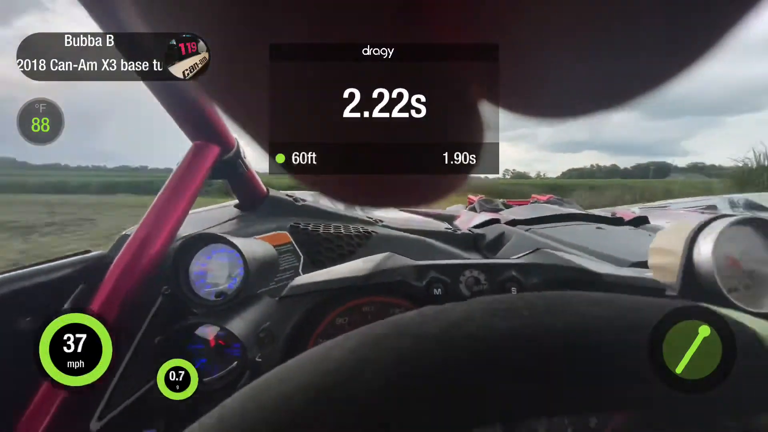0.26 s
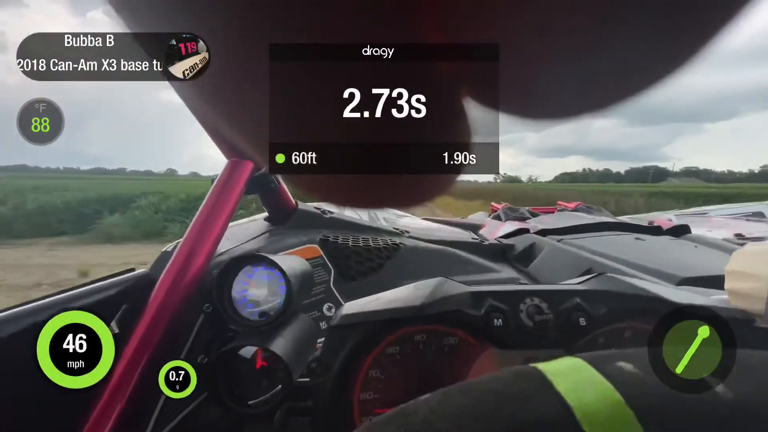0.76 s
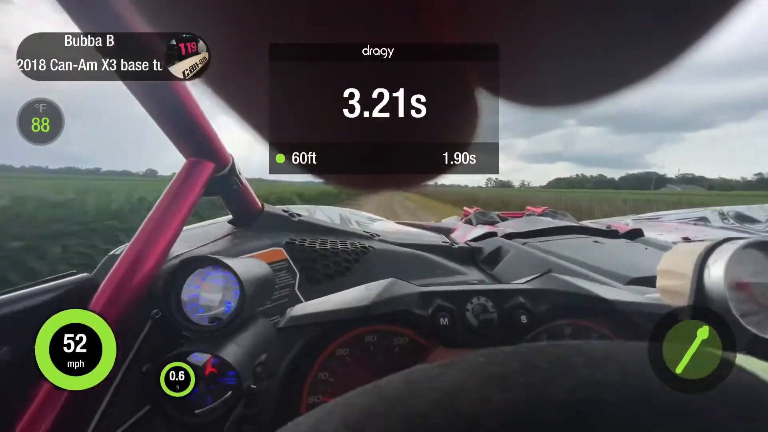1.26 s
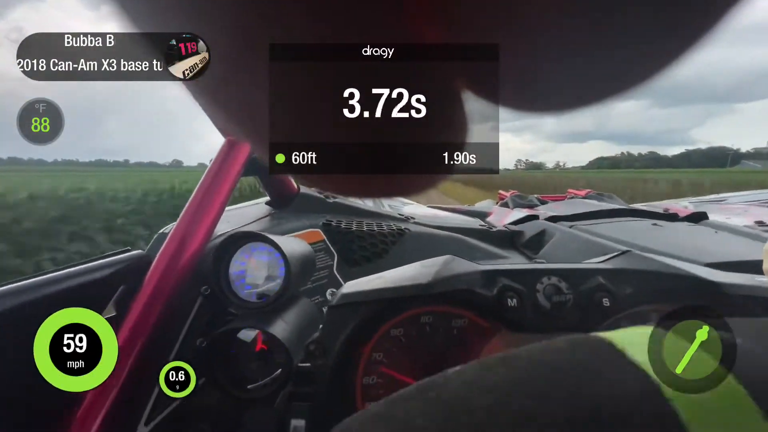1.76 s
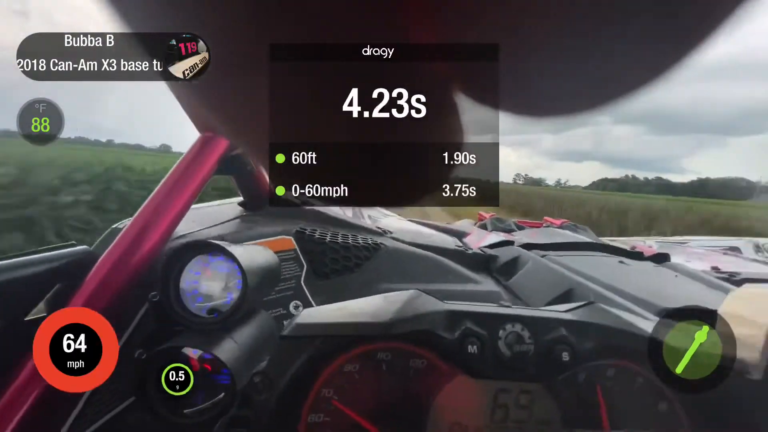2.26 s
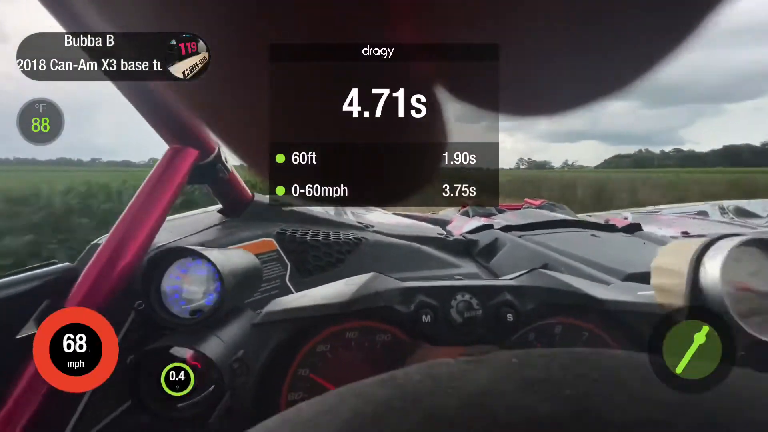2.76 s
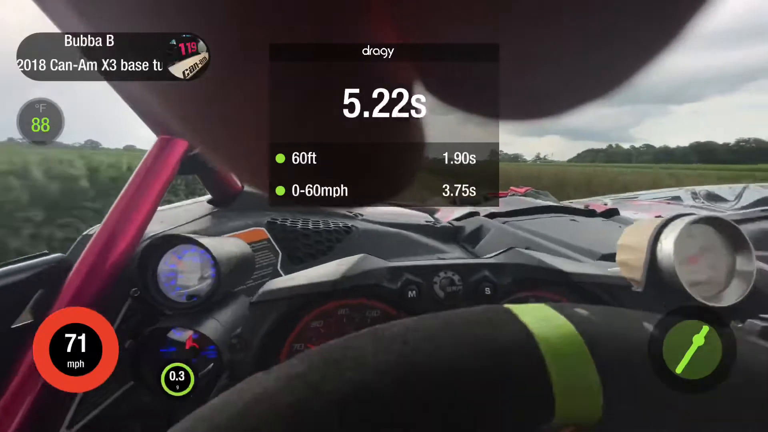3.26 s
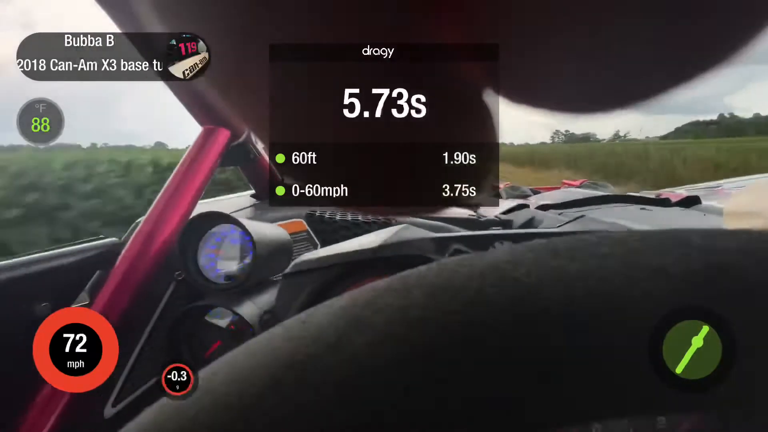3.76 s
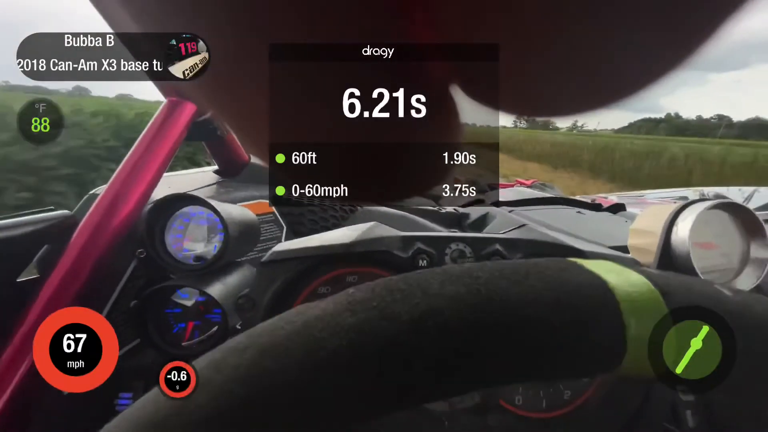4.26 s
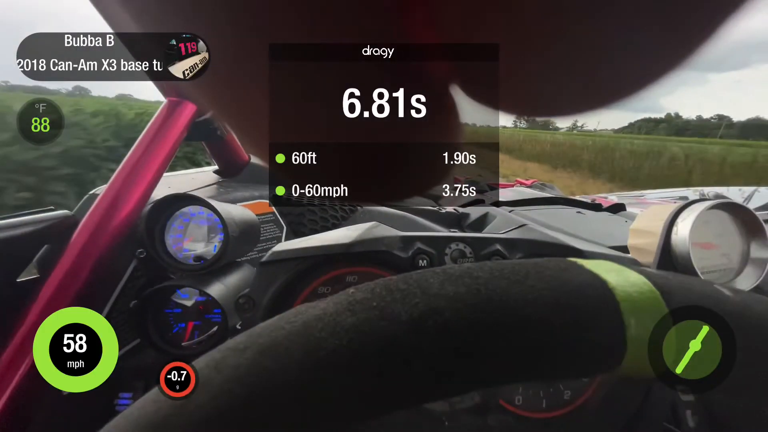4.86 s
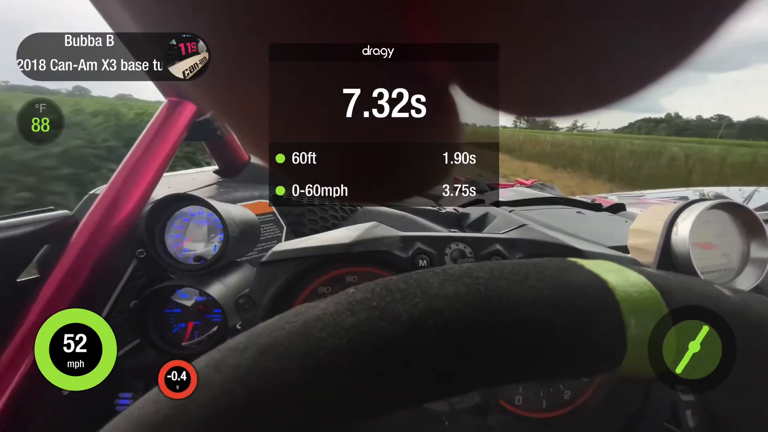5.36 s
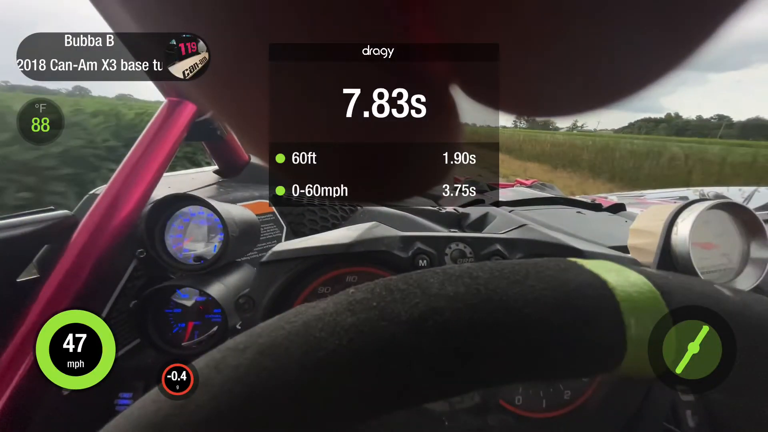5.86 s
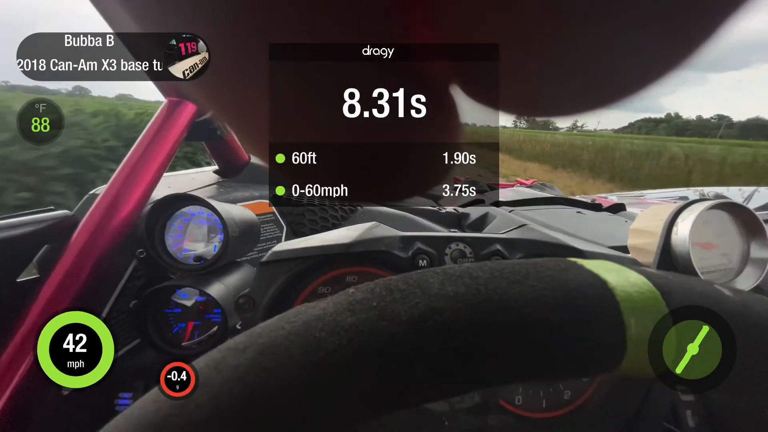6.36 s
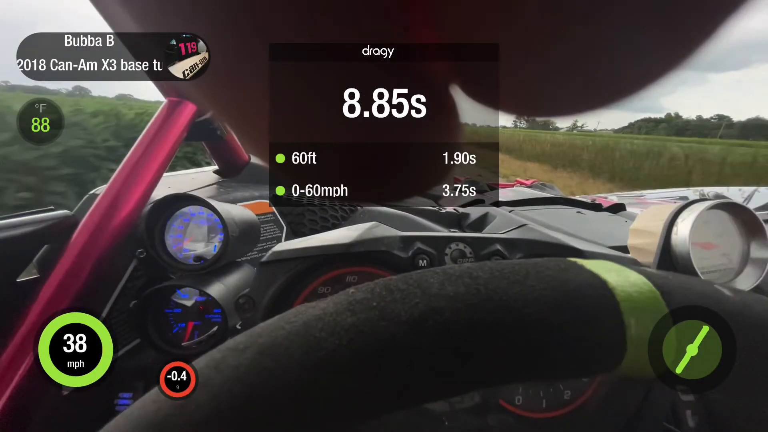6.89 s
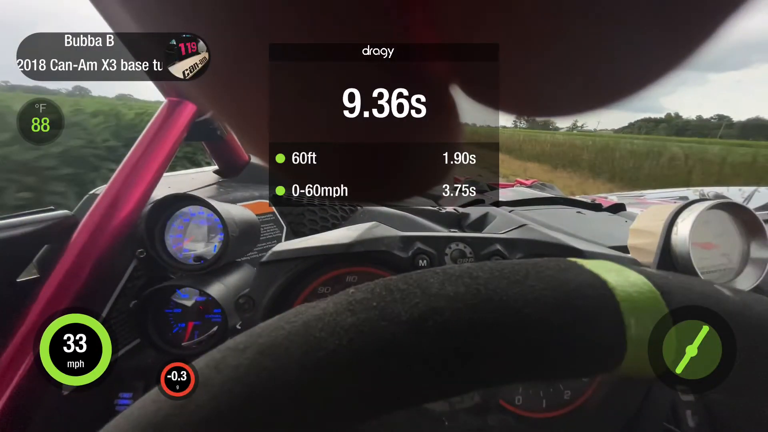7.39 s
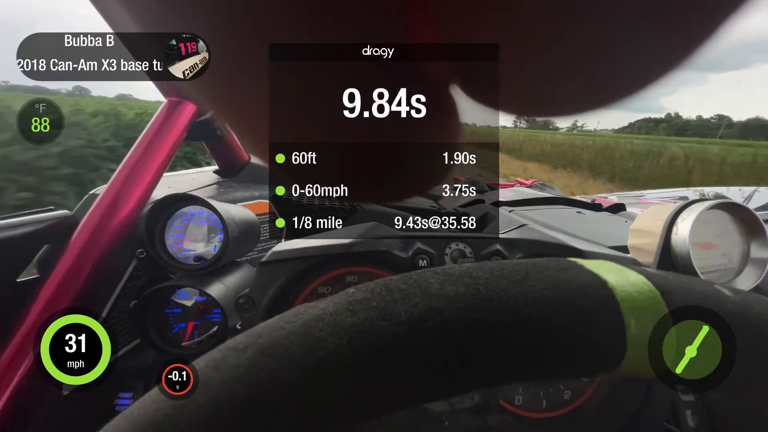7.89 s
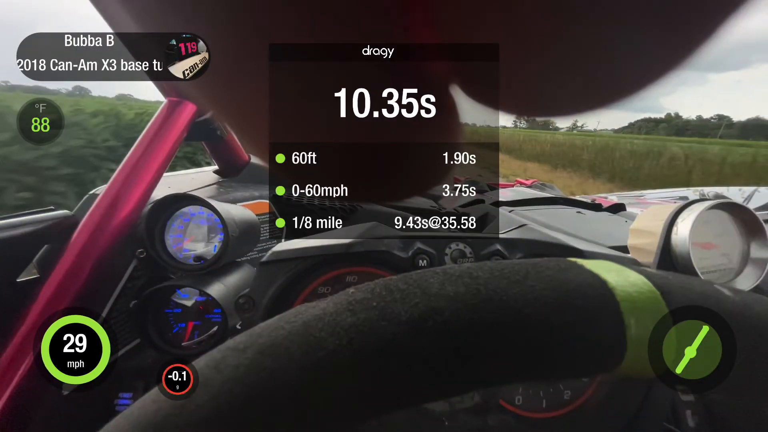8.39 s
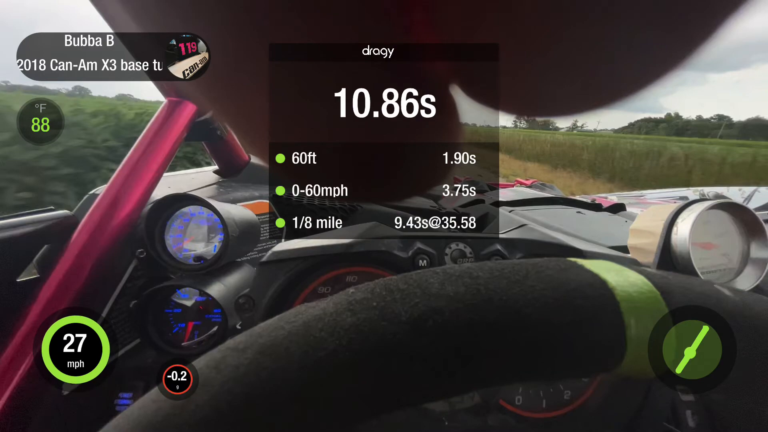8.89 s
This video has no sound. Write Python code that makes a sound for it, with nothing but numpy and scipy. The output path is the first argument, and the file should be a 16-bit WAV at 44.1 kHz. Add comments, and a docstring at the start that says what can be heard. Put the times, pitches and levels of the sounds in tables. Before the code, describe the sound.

Full-throttle turbo buggy engine and wind thumping the microphone, a brief silence, then lower, sputtering revs that slowly climb.

```python
"""In the open cab of a three-cylinder turbo buggy. At full throttle the firings blur into an exhaust
note over pulsing intake hiss, while head wind thumps, flutters and slaps ever harder on the microphone.
The sound cuts out. Then the engine revs at a standstill against a launch limiter that drops single
firings: exhaust pulses ring the pipe, knock and valve gear rattle the casing, and as the revs creep up,
whines, a panel squeal and the turbo whistle rise over fan noise and body rumble."""
import sys
import numpy as np
from scipy.fft import rfft, irfft, next_fast_len
from scipy.io import wavfile
from scipy.ndimage import map_coordinates

SR = 44100
rng = np.random.default_rng(int(sys.argv[2]) if len(sys.argv) > 2 else 0)


def transcribe(u):
    """Save the signal u as a 16-bit wav file named by the first command-line argument.

    u: samples, shape (n,) or (channels, n), limited to [-1, 1]; the rate is SR.
    q: integer samples, one column per channel.
    """
    v = np.clip(np.atleast_2d(u).T, -1, 1)
    q = np.round(v * 32767).astype(np.int16)
    wavfile.write(sys.argv[1], SR, q)


N = 402633
TIME = np.arange(N) / SR
CUT_S, STANDSTILL_S = 3.8615, 4.0945


def full_throttle():
    """The engine under load: exhaust note and intake hiss share one firing rhythm."""
    # t/s, firing rate/Hz, exhaust level/dB
    throttle = [(0, 213.9, -11), (.2, 215.3, -11.5), (.6, 217.9, -11.5), (1.15, 216.7, -14),
                (1.5, 221.9, -17), (1.92, 221.7, -15.5), (2.02, 218.4, -32.5), (2.12, 209, -20.5),
                (2.3, 218, -15.5), (2.55, 221.7, -21), (2.85, 225.3, -19), (3.2, 228.6, -19),
                (3.3, 227, -25.5), (3.5, 220, -29.5), (3.87, 203, -46.5)]
    firing_hz, note_db = curves(throttle)
    phase = firing_phase(firing_hz, waver_hz=.7)
    return amp(note_db) * exhaust_note(phase, firing_hz) + intake_hiss(phase)


def standstill():
    """The engine on the launch limiter, with its fan and the shaking body."""
    # t/s, firing rate/Hz, exhaust level/dB, clatter level/dB
    revs = [(4.095, 85, -32, -51.5), (4.18, 86.7, -24, -45), (4.45, 88.3, -21, -39.5),
            (4.7, 88.7, -20, -40), (4.9, 89.75, -20.5, -36.5), (5.25, 89.7, -20, -43),
            (5.55, 88.9, -19, -46.5), (5.8, 87.2, -19.5, -45), (6, 85.4, -18, -40.5),
            (6.2, 86.3, -17.5, -38), (6.64, 85.9, -17.5, -36), (7, 86.64, -16.5, -35.5),
            (7.42, 89.36, -14.5, -36), (7.75, 90.55, -14.5, -31), (8.09, 92, -14, -29.5),
            (8.35, 95.05, -13, -31), (8.65, 97.85, -14, -38), (8.9, 100.4, -13.5, -36),
            (9.13, 101.5, -13.5, -35.5)]
    firing_hz, exhaust_db, clatter_db = curves(revs)
    phase = firing_phase(firing_hz, waver_hz=.45)
    gaps_db = limiter_gaps()
    engine = exhaust_pulses(phase, exhaust_db - gaps_db) + amp(clatter_db) * clatter(phase, gaps_db)
    return engine + whines(phase) + panel_squeal() + turbo_whistle() + fan(exhaust_db) + body_rumble()


def exhaust_note(phase, firing_hz):
    """Fast firings fuse into a note; a cab resonance lifts the overtone passing through it."""
    # multiple of the firing rate, relative level/dB; thirds come from unlike cylinders
    orders = [(1, 0), (2, -11), (8 / 3, -17), (3, -14), (4, -15), (13 / 3, -19), (5, -14), (6, -21),
              (7, -18), (8, -24), (9, -19), (10, -25), (11, -26), (13, -25), (14, -27)]
    # cab resonance: f/Hz, width/Hz, lift/dB
    boom_hz, width_hz, boom_db = (900, 24, 11)
    note, overtone_db = np.zeros(N), -3.5
    for k, db in orders:
        lift_db = (k > 1) * overtone_db + boom_db * np.exp(-((k * firing_hz - boom_hz) / width_hz) ** 2)
        note += amp(db + lift_db + .49 * wobble(30)) * np.sin(k * phase + rng.uniform(0, 2 * np.pi))
    return np.sqrt(2) * note


def exhaust_pulses(phase, level_db):
    """One pulse a firing through pipe and muffler; the three cylinders differ a little."""
    # pipe response: f/Hz, gain/dB
    pipe = [(40, -41), (90, -1.5), (172, -1), (200, 4), (260, 3.5), (300, -6), (345, -10), (385, 0),
            (430, -14), (450, -14.5), (500, -13.5), (560, -29), (610, -22), (700, -22), (1100, -14.5),
            (3000, -37.5)]
    # muffler resonance, applied twice: f/Hz, width/Hz, gain/dB
    chamber = [(279, 414, 0)]
    k = np.arange(100)
    partials = np.where(k % 3, amp(-30) * np.exp(1j * k * k), 1) * (k > 0)
    pulses = -per_cycle(phase, partials) * amp(.7 * wobble(30))
    piped = filtered(pulses, causal(pipe))
    muffler = lambda hz: np.abs(modes(chamber)(hz)) ** 2
    return filtered(piped * amp(level_db), muffler) / np.std(filtered(piped, muffler))


def limiter_gaps():
    """Depth in dB of the holes that dropped firings leave."""
    # t/s, depth/dB
    misfires = [(4.114, 24), (4.155, 19), (4.228, 16), (4.324, 13), (4.398, 18), (4.463, 14), (4.578, 12),
                (5.22, 13), (5.281, 19), (5.315, 15), (5.353, 17), (5.389, 16), (5.415, 10), (5.45, 20),
                (5.485, 20), (5.519, 21), (5.561, 10), (5.588, 23), (5.628, 19), (5.657, 16), (5.692, 17),
                (5.728, 18), (5.763, 18), (5.796, 14), (5.832, 18), (5.87, 20), (5.972, 21)]
    return sum(db * bump(s, half_s=.006) for s, db in misfires)


def clatter(phase, gaps_db):
    """Combustion knock and valve gear ring the casing; the firing after a dropped one knocks harder."""
    # engine and cab panel modes: f/Hz, width/Hz, gain/dB
    casing = [(730, 62, -22.5), (864, 49, -2.5), (925, 39, 5.5), (1047, 25, -1), (1177, 17.5, 6),
              (1473, 83, -7), (1970, 180, -11), (2540, 200, -19), (3350, 330, -24)]
    relight_db = .7 * np.roll(gaps_db, round(.012 * SR)) - .2 * gaps_db
    pressure = np.maximum(np.cos(phase - 1.3), 0) ** 2
    knocks = rng.standard_normal(N) * (.5 + pressure * amp(.63 * wobble(30)))
    k = np.arange(110)
    lift_db = 4.5 * (k % 9 == 0)  # every third multiple of the firing rate
    gear = per_cycle(phase, np.exp(1j * k * k) * (k > 20) * amp(lift_db)) * amp(4 + 1.5 * wobble(15))
    ringing = filtered((knocks + gear) * amp(relight_db), modes(casing))
    return unit(ringing) * amp(.9 * wobble(12))


def wind():
    """Eddies thump and flutter on the microphone port in short lumps; the sharpest slap it."""
    # t/s, thump level/dB, flutter level/dB
    buffeting = [(0, -19.5, -22), (.35, -18, -21), (.6, -15.5, -16.5), (1.1, -15.5, -16.5),
                 (1.6, -14.5, -15.5), (1.95, -17, -14.5), (2.03, -18, -21), (2.25, -13.5, -15),
                 (3.24, -14.5, -13.5), (3.32, -17.5, -26), (3.55, -14, -15.5), (3.72, -17.5, -21),
                 (3.86, -14, -21)]
    # low thump: f/Hz, relative level/dB
    thump_colour = [(20, -10.5), (35, -11.5), (60, 3), (110, 0), (200, -6), (400, -9.5), (900, -36.5)]
    # brighter flutter: f/Hz, relative level/dB
    flutter_colour = [(60, -14), (150, -4), (300, -2.5), (600, -5), (1200, -14), (2500, -26), (5000, -41.5),
                      (13000, -76)]
    # slaps: t/s, strength/dB
    slap_hits = [(0.591, -3), (0.916, -6.5), (1.174, -3), (1.397, -8), (1.454, -7.5), (1.504, -3),
                 (1.66, -14), (1.715, -13.5), (1.77, -2), (1.832, 0), (1.943, 0), (2.042, -3.5),
                 (2.122, -6.5), (2.213, -4), (2.354, -2), (2.379, 1), (2.431, -6.5), (2.466, 0), (2.516, 5),
                 (2.539, 4.5), (2.572, -1.5), (2.655, -0.5), (2.687, 0.5), (2.748, -8.5), (2.966, 0),
                 (2.994, 1), (3.021, 0.5), (3.058, 1.5), (3.146, -2), (3.237, -5), (3.267, -2.5),
                 (3.343, -1.5), (3.377, -7.5), (3.398, 0), (3.434, -1), (3.453, 0), (3.476, -4),
                 (3.497, -3), (3.535, -1.5), (3.571, -3.5), (3.604, -1), (3.627, -4), (3.665, -6),
                 (3.738, -15.5), (3.765, -3.5), (3.807, 1), (3.831, -5), (3.845, -5)]
    # a slap's sharp edge: f/Hz, gain/dB
    crack_colour = [(100, -22), (400, -5.5), (1200, -6), (3000, -6), (7000, -22), (13700, -45)]
    thump_db, flutter_db = curves(buffeting)
    eddy, gusts_per_s = wobble(45), 14
    thump = unit(noise(thump_colour) * amp(.36 * eddy + wobble(gusts_per_s)))
    flutter = unit(noise(flutter_colour) * amp(1.8 * eddy + 2.1 * wobble(160) + wobble(gusts_per_s)))
    bursts, cracks = np.zeros(N + SR), np.zeros(N)
    t = np.arange(SR // 8) / SR
    attack_s, t60_s, crackle_s = .0007, .055, .012
    for s, db in slap_hits:  # each is a rush of air and three cracks
        bursts[round(s * SR):][:len(t)] += amp(db - 3 - 60 * t / t60_s) * (1 - np.exp(-t / attack_s))
        crack_s = s + crackle_s * rng.random(3) ** 2
        cracks[(crack_s * SR).astype(int)] = amp(db + 9) * rng.standard_normal(3)
    slaps = bursts[:N] * noise(flutter_colour) + filtered(cracks, causal(crack_colour))
    return amp(thump_db) * thump + amp(flutter_db) * flutter + slaps


def intake_hiss(phase):
    """Intake and turbo air pulses with each firing and puffs as boost is let off."""
    # t/s, level/dB
    boost = [(0, -20.5), (.44, -20), (1.89, -24.5), (2, -25.5), (2.05, -30), (2.18, -27), (3.25, -26),
             (3.43, -33), (3.86, -41)]
    # f/Hz, relative level/dB
    colour = [(350, -27.5), (600, -12.5), (649, -12.5), (769, -13.5), (1080, -8.5), (1620, -12.5),
              (4610, -16.5), (5540, -15), (9840, -27.5), (13600, -25)]
    # t/s, rise/dB, half length/s
    puffs = [(0.188, 4.5, 0.012), (1.967, 4.5, .04), (3.301, 5, 0.07)]
    hiss = unit(noise(colour) * (1 + .11 * np.cos(phase)) * amp(.66 * wobble(40.04)))
    puff_db = sum(db * bump(s, half_s) for s, db, half_s in puffs)
    return amp(curves(boost)[0] + puff_db) * hiss


def whines(phase):
    """Engine overtones, cued for the moments when the revs carry them through a panel resonance."""
    # start/s, end/s, level/dB
    cues = [(5.9, 7.2, -44), (5.9, 7.4, -41), (7.45, 8.3, -34.5), (7.7, 8.45, -34.5), (8.3, 9.3, -41),
            (8.45, 9.3, -37), (8.45, 8.72, -43), (8.6, 9.3, -38), (5.9, 7.4, -44)]
    # each cue's multiple of the firing rate
    orders = (14, 32 / 3, 13, 10, 34 / 3, 28 / 3, 62 / 3, 6, 6)
    tones = np.zeros(N)
    for k, (start, end, db) in zip(orders, cues):
        gate = fade_in(start, edge_s=.038) - fade_in(end, edge_s=.038)
        tones += amp(db + 1.8 * wobble(45)) * gate * np.sin(k * phase + .25 * wobble(60))
    return np.sqrt(2) * tones


def panel_squeal():
    """A panel's narrow, fluttering ring swells once near the top of the revs."""
    return amp(-57 + 15 * bump(8.6, half_s=.4)) * narrow_noise(hz=2035, width_hz=45)


def turbo_whistle():
    """The turbo comes in late as a faint, breathy whistle."""
    return amp(-56) * fade_in(7.6, edge_s=.1) * narrow_noise(hz=6600, width_hz=2200)


def fan(exhaust_db):
    """Fan and intake air rushes louder as the engine works harder."""
    # f/Hz, relative level/dB
    colour = [(400, -16), (700, 1.5), (1500, -1.5), (2200, -3.5), (2940, -10.5), (4150, -18.5),
              (6460, -23.5), (9670, -34), (12400, -31.5), (13790, -28.5)]
    effort_db = exhaust_db + 18
    return amp(-38.5 + .69 * effort_db + .61 * wobble(20)) * noise(colour)


def body_rumble():
    """The body starts to shake at the standstill and eases once the engine fires evenly."""
    # f/Hz, relative level/dB
    colour = [(20, -36), (45, -8), (80, -3.5), (125, -12), (170, -13.5), (300, -12), (600, -22.5)]
    wake = 1 - np.exp(-np.abs(TIME - STANDSTILL_S) / .3)
    level_db = -32.5 - 1.5 * fade_in(6.8, edge_s=.3)
    return wake * amp(level_db) * unit(noise(colour) * amp(1.7 * wobble(6)))


def firing_phase(hz, waver_hz):
    """Radians, one turn a firing, at a slightly unsteady speed."""
    return 2 * np.pi * np.cumsum(hz + waver_hz * wobble(25)) / SR


def per_cycle(phase, partials):
    """A wave that repeats every three firings, from its complex partials."""
    wave = unit(irfft(partials, 8192))
    return np.interp(phase / (6 * np.pi) % 1, np.linspace(0, 1, len(wave) + 1), np.append(wave, wave[0]))


def amp(db):
    """Decibels to gain."""
    return np.exp(np.asarray(db) * (np.log(10) / 20))


def unit(x):
    """Scaled to rms 1."""
    return x / np.sqrt(np.mean(x ** 2) + 1e-20)


def curves(rows):
    """One value per sample for each column after the time."""
    s, *cols = np.transpose(rows)
    return [np.interp(TIME, s, c) for c in cols]


def bump(s, half_s):
    """A bell in time, height 1."""
    return np.exp(-((TIME - s) / half_s) ** 2)


def fade_in(s, edge_s):
    """A smooth step from 0 to 1."""
    return .5 + .5 * np.tanh((TIME - s) / edge_s)


def wobble(rate):
    """A smooth random curve, rate knots a second."""
    coarse = TIME[::32]
    knots = rng.standard_normal(int(N * rate / SR) + 4)
    return np.interp(TIME, coarse, map_coordinates(knots, [coarse * rate]))


def along(points, hz):
    """Gain along an EQ curve of (f/Hz, level/dB) points on a log axis."""
    f, db = np.transpose(points)
    return amp(np.interp(np.log(hz + 1), np.log(f + 1), db, left=-120, right=-120))


def filtered(x, response):
    """x through a complex frequency response."""
    m = 2 * next_fast_len(N // 2 + SR // 4)
    return irfft(rfft(x, m) * response(np.fft.rfftfreq(m, 1 / SR)), m)[..., :N]


def causal(points):
    """The minimum-phase response of an EQ curve."""
    def response(hz):
        cepstrum = irfft(np.log(along(points, hz) + 1e-4))
        cepstrum[1:len(hz) - 1] *= 2
        cepstrum[len(hz):] = 0
        return np.exp(rfft(cepstrum))
    return response


def modes(table):
    """The response of (f/Hz, width/Hz, gain/dB) resonances of alternating sign."""
    return lambda f: sum((-1) ** k * amp(db) * 1j * f * width / (hz * hz - f * f + 1j * f * width)
                         for k, (hz, width, db) in enumerate(table))


def noise(points):
    """Coloured noise of rms 1."""
    return unit(filtered(rng.standard_normal(N), lambda hz: along(points, hz)))


def narrow_noise(hz, width_hz):
    """Noise passed twice through one resonance, rms 1."""
    return unit(filtered(rng.standard_normal(N), lambda f: modes([(hz, width_hz, 0)])(f) ** 2))


def scene():
    """The windy pull, a silent cut, then the standstill revs."""
    cut = np.clip((CUT_S - TIME) / .002, 0, 1)
    return ((full_throttle() + wind()) * cut + standstill() * (TIME > STANDSTILL_S))[None]


def record(dry):
    """Loud peaks are rounded off and the top treble is cut."""
    ceiling, top_hz = .93, 13800
    soft = dry / (1 + np.abs(dry / ceiling) ** 4) ** (1 / 4)
    return filtered(soft, lambda hz: hz < top_hz)


dry = scene()
out = record(dry)
transcribe(out)
```